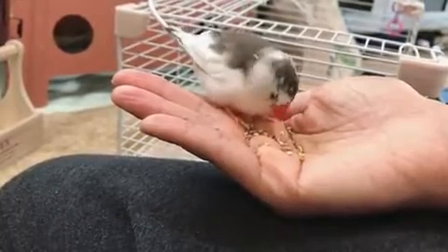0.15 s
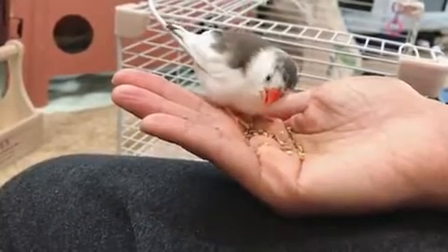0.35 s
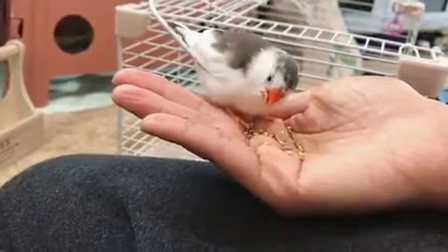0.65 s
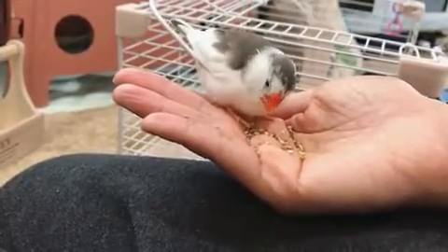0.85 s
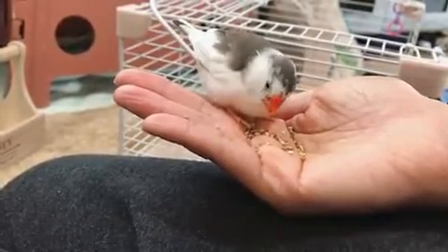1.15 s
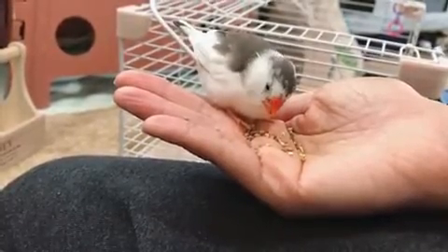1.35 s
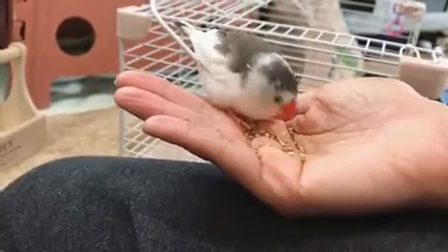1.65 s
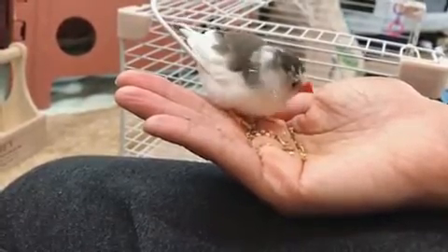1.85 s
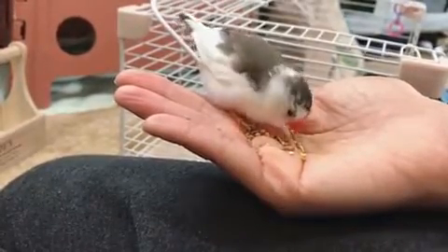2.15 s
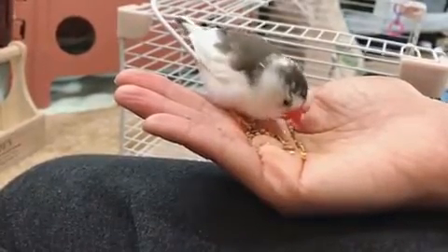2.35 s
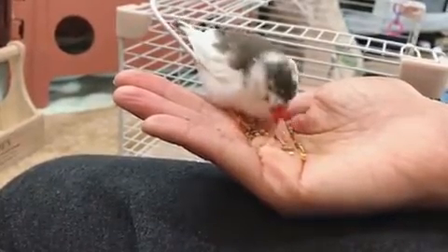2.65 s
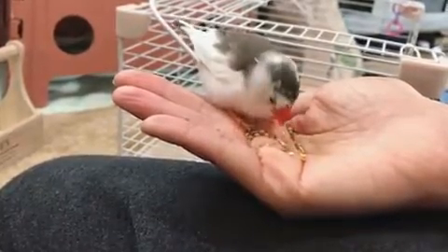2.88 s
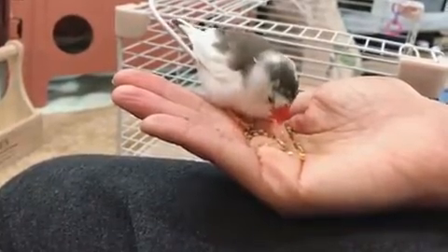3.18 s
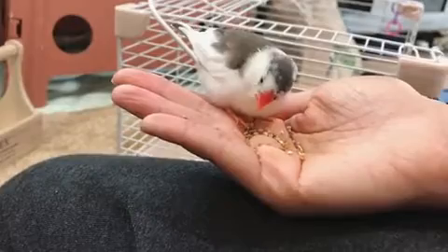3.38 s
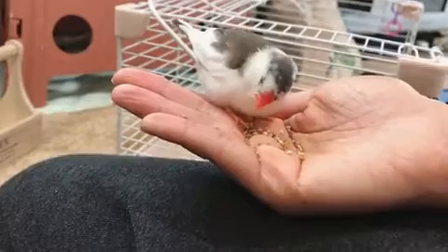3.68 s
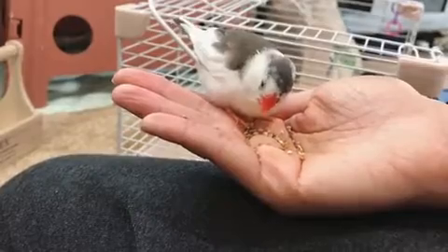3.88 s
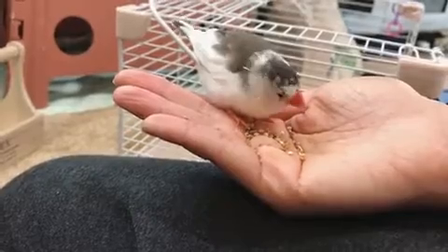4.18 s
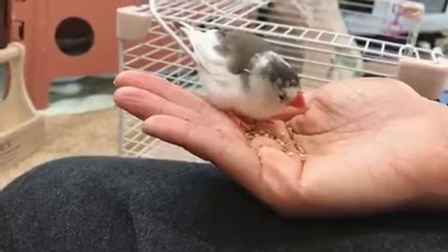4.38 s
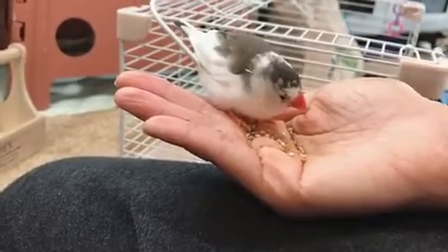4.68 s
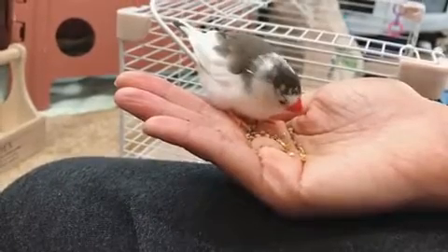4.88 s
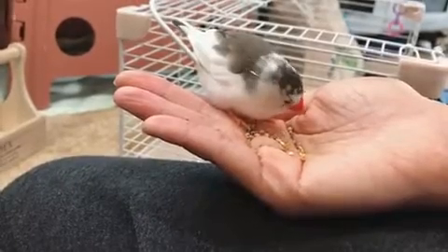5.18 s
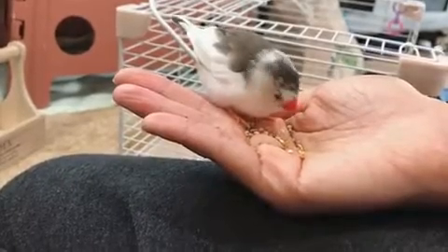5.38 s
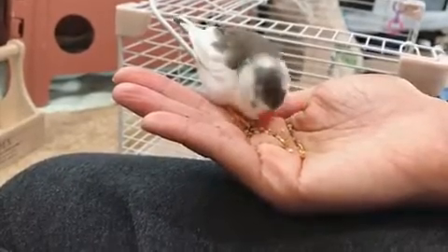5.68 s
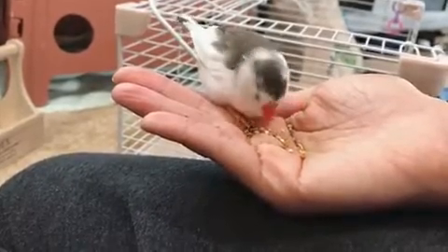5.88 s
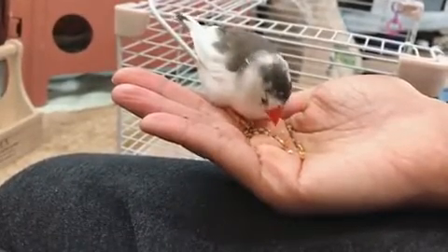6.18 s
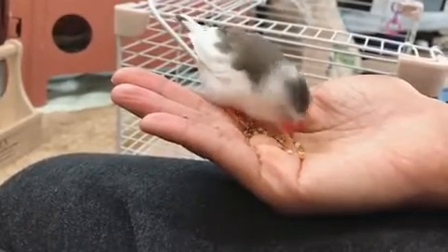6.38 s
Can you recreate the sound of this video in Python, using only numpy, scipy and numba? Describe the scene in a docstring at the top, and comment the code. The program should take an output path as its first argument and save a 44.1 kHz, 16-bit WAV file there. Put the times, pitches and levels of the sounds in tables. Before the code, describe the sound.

A small room with a low appliance hum and a faint fluttering hiss throughout. Close by, a finch eats seed from a hand, making tiny irregular husk cracks and light rustles all the way through, with the clearest clicks at about 2.1, 4.1 and 4.5 seconds. A very soft nasal call comes at 0.6 seconds. From 1.3 to 1.9 seconds there is a rapid run of high chirps, mixing gliding whistles with hoarse rasps. The chirps are the loudest sound and seem a little farther away, ringing briefly off the walls. A single short chirp follows at 2.7 seconds, then another quick cluster from 3.7 to 4 seconds. Two more very soft nasal calls come at 5.1 and 5.6 seconds, just before a last brief burst of chirps at 5.8. Quiet nibbling and rustling carry on until about 6.6 seconds.

```python
"""Zebra finches in a small room.

Quick chirps, made of gliding whistles and hoarse rasps from a flapping syrinx, ring off the walls.
Between them come a few very soft nasal calls; close by, a finch cracks and sifts seed in a hand.
Under it all an appliance hums, and bands of background noise flutter, the strongest near 1.9 kHz."""
import sys
import numpy as np
from scipy import signal
from scipy.fft import rfft, irfft
from scipy.io import wavfile
from numba import njit

SR = 44100
rng = np.random.default_rng(int(sys.argv[2]) if len(sys.argv) > 2 else 0)


def master(y):
    """Save y as 16-bit WAV."""
    cut = np.clip(np.atleast_2d(y).T, -1, 1)
    pcm = np.round(cut * 32767)  # scale
    wavfile.write(sys.argv[1], SR, pcm.astype(np.int16))


N = 287973
TIME_S = np.arange(N) / SR
TOP_HZ = 14000

# room tone spectrum: freq_hz, gain_db
ROOM_SPECTRUM = [(15, -37), (25, -13), (60, 0.5), (122, -3), (177, -9), (300, -9), (520, -17), (800, -19),
                 (1500, -16.5), (1920, -23), (2400, -22.5), (3500, -23.5), (5900, -27.5), (6900, -32.5),
                 (14000, -32.5)]
# appliance hum: freq_hz, level_db
HUM_LINES = [(55, -72.5), (76, -71.5), (120, -74), (283, -85.5)]
# fluttering bands of background noise: centre_hz, width_hz, level_db
NOISE_BANDS = [(1072, 130, -80), (1661, 15, -76.5), (1934, 146, -70), (2530, 260, -78), (3740, 2100, -88.5)]
# beak on seed: start_s, peak_db, ring_hz, decay_s
SEED_CRACKS = [(0.293, -53.5, 7250, 0.0073), (0.965, -54, 1950, 0.0045), (1.265, -54, 9000, 0.0029),
               (2.08, -48, 1870, 0.0098), (2.191, -53, 2240, 0.0045), (2.517, -52.5, 7700, 0.0045),
               (2.645, -49, 2300, .004), (2.9876, -50, 7240, .002), (3.376, -52, 2110, 0.0041),
               (3.665, -54, 3660, 0.0054), (4.073, -43.5, 12000, 0.0017), (4.245, -52, 2820, 0.0074),
               (4.476, -40.5, 3240, 0.00075), (4.760, -50, 1850, 0.0097), (4.799, -55, 7950, 0.012),
               (6.118, -52.5, 9000, 0.0018), (6.211, -55, 9550, 0.016), (6.288, -51.5, 2940, 0.03)]
# seed and skin shifting in the palm: start_s, length_s, level_db, centre_hz
PALM_RUSTLES = [(0.043, 0.047, -71, 8000), (0.95, 0.38, -72, 3400), (2.972, 0.054, -65, 6800),
                (3.144, 0.26, -73.5, 7860), (3.99, 0.13, -69, 450), (4.539, 0.089, -67.5, 8300),
                (4.882, 0.09, -67.5, 8250), (5.408, 0.053, -71, 8000), (5.847, 0.75, -68, 257),
                (6.276, 0.048, -65.5, 9000)]
# soft calls: start_s, length_s, pitch_hz, level_db, throat_hz, throat_width_hz, jitter_ratio, body_db
NASAL_CALLS = [(0.576, 0.063, 513, -59, 3500, 2190, 0.014, -8),
               (5.099, 0.037, 335, -59.5, 2830, 800, 0.046, -24),
               (5.637, 0.063, 513.5, -60, 3250, 1500, 0.03, -7.5)]
# throat response for rasps: freq_hz, gain_db
THROAT_SPECTRUM = [(1200, -42), (2000, -6), (2800, 8), (4200, 8.5), (5800, 9.5), (7200, -2), (8800, -4),
                   (10300, -9), (12000, -4.5), (14000, -23)]
# hoarse notes: peak_s, rise_s, fall_s, pitch_hz, level_db, treble_db
RASP_NOTES = [ (1.321, 0.026, 0.027, 3100, -47, 6), (1.458, 0.019, 0.018, 4716, -42.5, 2),
              (1.587, 0.015, 0.0092, 5000, -39.5, 5), (1.608, 0.02, 0.0065, 6510, -45.5, 3),
              (1.672, 0.021, 0.018, 3354, -43.5, 5.5), (1.778, 0.012, 0.0096, 5770, -47, 2),
              (1.798, .012, 0.0068, 3490, -37.5, 6), (1.879, 0.013, 0.01, 3010, -48.5, 5),
              (1.903, .018, 0.02, 6200, -45, -8), (2.692, 0.011, .012, 3530, -53.5, 7),
              (2.732, .007, 0.012, 3696, -42, -2), (3.750, .015, 0.044, 4000, -42.5, -1),
              (3.816, 0.037, 0.015, 3170, -43, 6), (3.930, 0.044, 0.031, 3696, -45, 3.5),
              (3.989, 0.033, 0.042, 4110, -41, -11), (5.770, .006, .018, 3460, -54, 3),
              (5.803, .023, 0.0244, 3600, -41, 3), (5.833, .020, 0.058, 4040, -47, -8),
              (5.894, 0.014, 0.016, 3323, -43, -2), (5.890, .016, 0.0202, 5390, -45, 2), ]
# whistled notes: peak_s, rise_s, fall_s, start_hz, end_hz, level_db, octave_db
WHISTLE_NOTES = [ (1.335, .024, 0.0068, 3136, 4864, -37, -12.5),
                 (1.437, .014, 0.0083, 5870, 5260, -45.5, -14),
                 (1.446, 0.0048, 0.022, 5910, 5460, -39, -18.5),
                 (1.458, 0.00694, 0.0074, 4454, 4046, -35, -19),
                 (1.58, 0.019, 0.008, 6277, 5260, -40.5, -12.5), (1.59, 0.0073, 0.01, 4537, 4380, -33, -17),
                 (1.607, 0.0073, 0.0072, 6530, 6830, -38.5, -29.5),
                 (1.662, 0.0063, 0.022, 2284, 3530, -45, -27), (1.682, .012, .018, 4385, 3930, -38, -15),
                 (1.786, .012, .020, 4560, 4120, -31.5, -13),
                 (1.879, 0.0078, 0.017, 2935, 2480, -50.5, -10),
                 (1.901, 0.02, .026, 6650, 4560, -32.5, -12),
                 (2.701, .005, 0.013, 2540, 2444, -52.5, -22.5),
                 (2.708, 0.016, .022, 5880, 6790, -35.5, -19.5), (2.741, .012, 0.02, 3855, 4590, -45, -15),
                 (3.737, 0.0083, 0.018, 2610, 2630, -47.5, -4),
                 (3.753, 0.018, 0.022, 4150, 4430, -43, -9.5), (3.782, .016, 0.018, 4750, 3417, -37, -22),
                 (3.803, 0.013, 0.021, 3330, 3150, -49.5, 6.5),
                 (3.910, 0.02, 0.0071, 3090, 4320, -44.5, -5.5),
                 (3.927, 0.01, 0.0065, 4400, 4690, -31.5, -17),
                 (3.943, .010, 0.0047, 3470, 3920, -38.5, -2.5),
                 (3.972, 0.033, 0.022, 2792, 2918, -45.5, 0.5),
                 (3.990, 0.0052, 0.031, 4534, 4080, -38.5, -26),
                 (5.788, .013, 0.0187, 2027, 2320, -49.5, -8),
                 (5.860, 0.042, 0.0234, 4790, 4416, -32.5, -22.5), ]


def undb(db):
    """Decibels to gain."""
    return 10 ** (np.asarray(db) / 20)


def unit(x):
    """Scale to rms 1."""
    return x / np.sqrt(np.mean(x ** 2) + 1e-20)


def colour(x, points):
    """Filter by a (freq_hz, gain_db) outline."""
    hz, db = np.transpose(points)
    bins_hz = np.maximum(np.fft.rfftfreq(len(x), 1 / SR), 1)
    return irfft(rfft(x) * undb(np.interp(np.log(bins_hz), np.log(hz), db)), len(x))


def resonate(x, hz, width_hz, stages=1):
    """Identical resonators in series, gain 1 at the centre."""
    q = hz / min(width_hz, SR / 5)
    for _ in range(stages):
        x = signal.lfilter(*signal.iirpeak(min(hz, SR / 2 - 2000), q, fs=SR), x)
    return x


@njit
def high_pass(x, corner_hz):
    """State-variable high-pass, moving corner."""
    y, band, low = np.empty(len(x)), 0., 0.
    for i in range(len(x)):
        g = np.tan(np.pi * corner_hz[i] / SR)
        v = (band + g * (x[i] - low)) / (1 + g * (g + 1.2))
        y[i] = x[i] - 1.2 * v - (low + g * v)
        band, low = 2 * v - band, low + 2 * g * v
    return y


def wander(n, rate_hz):
    """Interpolated noise, spread near 1."""
    position = np.arange(n) / SR * rate_hz
    return np.interp(position, np.arange(n), rng.standard_normal(n))


def add(out, start_s, x):
    """Mix x in at start_s."""
    i = max(int(start_s * SR), 0)
    out[i:i + len(x)] += x[:len(out) - i]


def background(room_tone_db=-62, drift_db=2.5, drift_hz=1.16):
    """Room rumble and hiss, wavering appliance hum, fluttering noise bands."""
    out = undb(room_tone_db) * unit(colour(rng.standard_normal(N), ROOM_SPECTRUM))
    for hz, level_db in HUM_LINES:
        phase = 2 * np.pi * np.cumsum(hz + drift_hz * wander(N, 6)) / SR
        out += undb(level_db + drift_db * wander(N, 1.91)) * unit(np.sin(phase))
    flutter_db = 2.6 * wander(N, 30) + 1.6 * wander(N, 9)
    for centre_hz, width_hz, level_db in NOISE_BANDS:
        band = resonate(rng.standard_normal(N), centre_hz, 2 * width_hz, stages=2)
        out += undb(level_db + flutter_db) * unit(band)
    return out


def room(x, tail_db, early_db, t60_s=0.27, treble_t60_s=0.19, split_hz=7500, echoes=24):
    """Direct sound, echoes off near furniture, then a diffuse tail whose treble dies first."""
    t = TIME_S[:SR * 2 // 3]
    low, high = (signal.sosfilt(signal.butter(2, split_hz, side, fs=SR, output="sos"),
                                rng.standard_normal(len(t))) for side in ("low", "high"))
    tail = low * 1e-3 ** (t / t60_s) + high * 1e-3 ** (t / treble_t60_s)
    tail *= 1 - np.exp(-t / 0.0086)  # build-up
    early = np.zeros(len(t))
    for when, size in rng.random((echoes, 2)):
        delay_s = .001 + .012 * when
        early[int(delay_s * SR)] += 2 * size - 1
    response = undb(tail_db) * tail / np.linalg.norm(tail)
    response += undb(early_db) * early / np.linalg.norm(early)
    return x + signal.fftconvolve(x, response)[:N]


def crack(peak_db, ring_hz, decay_s):
    """A husk snaps: a tiny burst rings the beak."""
    t = TIME_S[:SR // 30]
    burst = rng.standard_normal(len(t)) * np.exp(-t / decay_s)
    snap = resonate(burst, ring_hz, 0.68 * ring_hz, stages=2)
    return undb(peak_db) * snap / np.abs(snap).max()


def feeding(nibbles=70, nibble_db=-58, spread_db=3):
    """Clear cracks, fainter random nibbles, rustling in the palm."""
    out = np.zeros(N)
    for start_s, peak_db, ring_hz, decay_s in SEED_CRACKS:
        add(out, start_s, crack(peak_db, ring_hz, decay_s))
    for when, size, pitch in rng.random((nibbles, 3)):
        peak_db = nibble_db + spread_db * (2 * size - 1)
        add(out, when * N / SR, crack(peak_db, ring_hz=1700 * 3 ** (pitch ** 2), decay_s=.008))
    for start_s, length_s, level_db, centre_hz in PALM_RUSTLES:
        n = int(length_s * SR)
        grains = rng.standard_normal(n) * rng.exponential(size=n)
        rustle = unit(resonate(grains, centre_hz, 0.61 * centre_hz))
        add(out, start_s, undb(level_db) * rustle * signal.windows.tukey(n, .8))
    return out


def membrane(hz, n, jitter_ratio):
    """Membrane slaps at an unsteady rate: returns a stack of equal harmonics and its phase."""
    max_hz = np.max(hz)
    phase = 2 * np.pi * np.cumsum(hz * (1 + jitter_ratio * wander(n, max_hz / 2))) / SR
    slaps = sum(np.cos(k * phase) for k in range(1, int(TOP_HZ / max_hz) + 1))
    return unit(slaps), phase


def soft_call(length_s, pitch_hz, level_db, throat_hz, throat_width_hz, jitter_ratio, body_db):
    """Harmonics through a nearly closed beak, plus a low body resonance; the pitch arches slightly."""
    n = int(length_s * SR)
    arch_hz = pitch_hz * (1 - 0.076 * np.linspace(-1, .7, n) ** 2)
    slaps, _ = membrane(arch_hz, n, jitter_ratio)
    throat = unit(resonate(slaps, throat_hz, throat_width_hz, stages=2))
    body = unit(resonate(slaps, hz=1020, width_hz=200, stages=2))
    return undb(level_db) * (throat + undb(body_db) * body) * signal.windows.tukey(n, .8)


def swell(rise_s, fall_s):
    """One push of air: a smooth rise to 1, then a fall."""
    rise, fall = (np.linspace(0, np.pi / 2, max(int(s * SR), 2)) for s in (rise_s, fall_s))
    return np.sin(np.concatenate([rise, fall[::-1]])) ** 1.3


def rasp(pitch_hz, flap_hz=760, smear_ratio=0.078, air_db=-7):
    """The syrinx flaps irregularly, smearing the harmonics and letting out puffs of air."""
    n = len(pitch_hz)
    slaps, flap_phase = membrane(flap_hz, n, jitter_ratio=0.131)
    opening = 1 + np.cos(flap_phase)
    phase = 2 * np.pi * np.cumsum(pitch_hz * (1 + smear_ratio * wander(n, 2 * flap_hz))) / SR
    harmonics = sum(np.cos(k * phase + k * k) * (k * pitch_hz < TOP_HZ) for k in range(1, 7))
    air = unit(slaps + opening * rng.standard_normal(n))
    voiced = unit(harmonics * opening * wander(n, flap_hz))
    buzz = colour(voiced + undb(air_db) * air, THROAT_SPECTRUM)
    corner_hz = 0.85 * pitch_hz  # the throat passes little below the pitch
    return unit(high_pass(high_pass(buzz, corner_hz), corner_hz))


def whistle(gain, start_hz, end_hz, octave_db, rasp_gain, third_db=-23, flutter_db=2):
    """A tone with two overtones glides, fastest at first; it shakes more as a rasp takes over."""
    n = len(gain)
    glide_hz = start_hz * (end_hz / start_hz) ** (np.linspace(0, 1, n) ** 0.834)
    rasp_share = rasp_gain / (rasp_gain + gain + 1e-12)
    waver = (0.026 + 0.056 * rasp_share) * wander(n, 722.5)
    phase = 2 * np.pi * np.cumsum(glide_hz * (1 + waver)) / SR
    tone = np.sin(phase) + undb(octave_db) * np.sin(2 * phase) + undb(third_db) * np.sin(3 * phase)
    return np.sqrt(2) * gain * undb(flutter_db * wander(n, 500)) * tone


def chirps(sag_ratio=0.0601):
    """One swell per note; a rasp sags in pitch and unsettles any whistle it overlaps."""
    out, rasp_gain = np.zeros(N), np.zeros(N)
    for peak_s, rise_s, fall_s, pitch_hz, level_db, treble_db in RASP_NOTES:
        gain = undb(level_db) * swell(rise_s, fall_s)
        sagging_hz = pitch_hz * (1 + sag_ratio * np.linspace(1, -1, len(gain)))
        voice = colour(rasp(sagging_hz), [(4000, 0), (11000, treble_db)])
        add(out, peak_s - rise_s, gain * unit(voice))
        add(rasp_gain, peak_s - rise_s, gain)
    for peak_s, rise_s, fall_s, start_hz, end_hz, level_db, octave_db in WHISTLE_NOTES:
        gain = undb(level_db) * swell(rise_s, fall_s)
        overlap = rasp_gain[int((peak_s - rise_s) * SR):][:len(gain)]
        add(out, peak_s - rise_s, whistle(gain, start_hz, end_hz, octave_db, overlap))
    return out


def scene():
    """Chirps across the room; feeding and soft calls close and nearly dry."""
    near = feeding()
    for start_s, *call in NASAL_CALLS:
        add(near, start_s, soft_call(*call))
    far = room(chirps(), tail_db=-1, early_db=-7)
    near = room(near, tail_db=-12, early_db=-12)
    return (far + near + background())[None]


def record(dry):
    """Steep low-pass at TOP_HZ."""
    return signal.sosfilt(signal.ellip(10, .2, 70, TOP_HZ, fs=SR, output="sos"), dry)


dry = scene()
out = record(dry)
master(out)
```